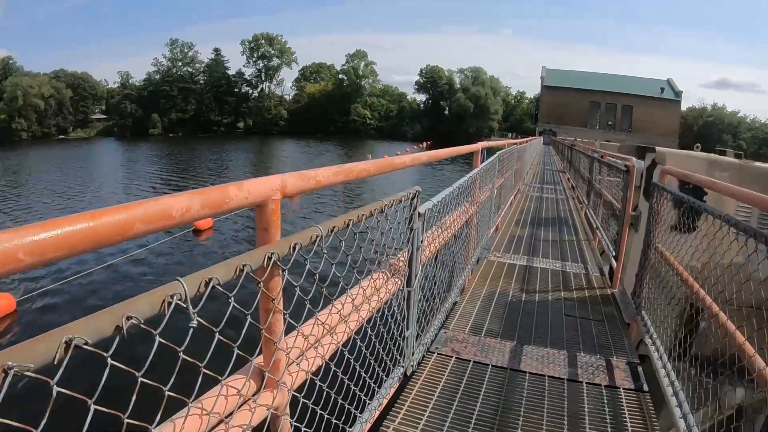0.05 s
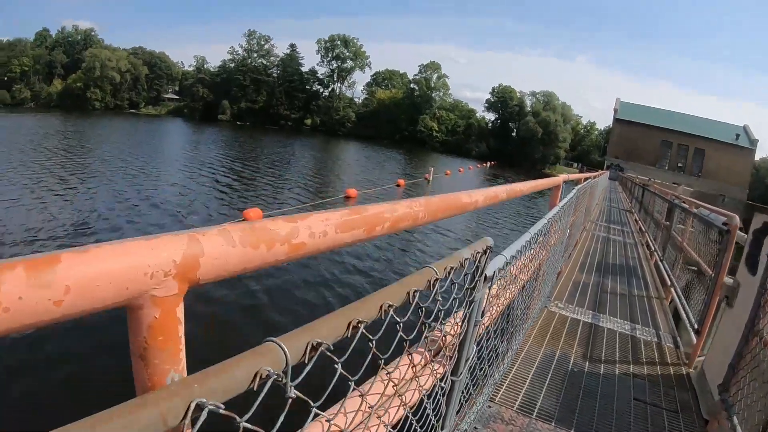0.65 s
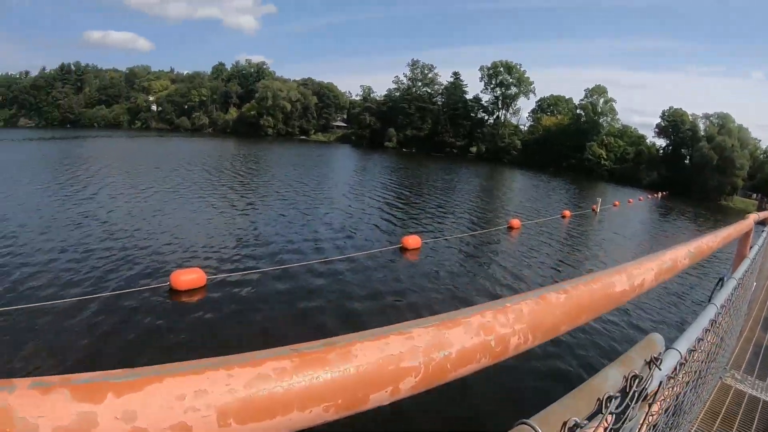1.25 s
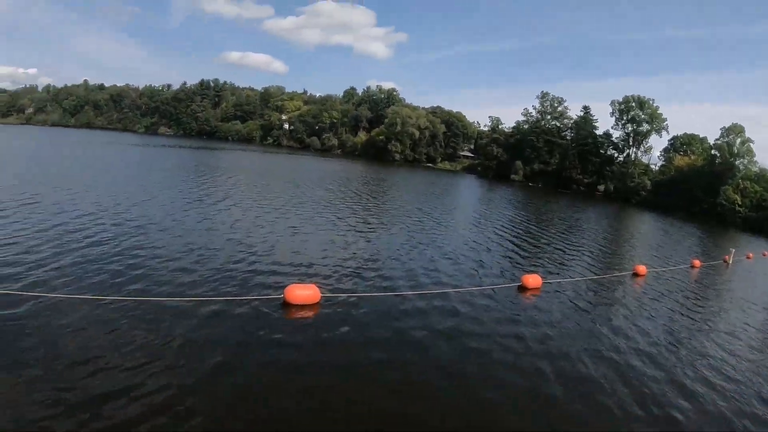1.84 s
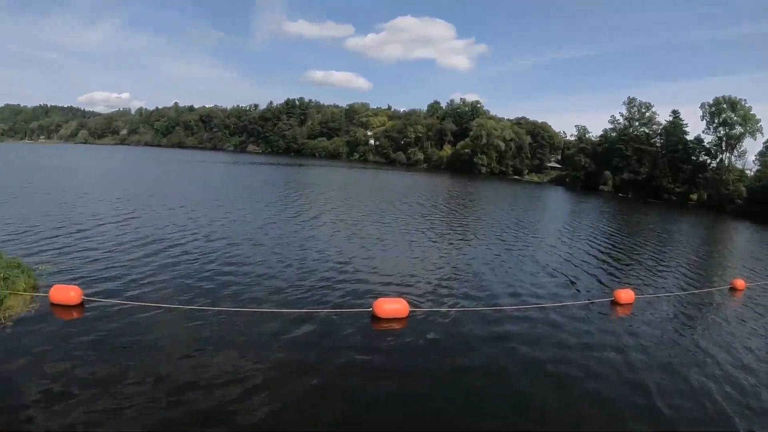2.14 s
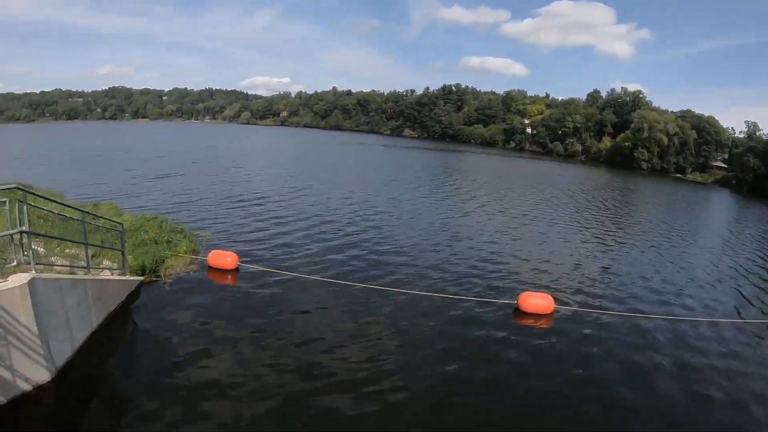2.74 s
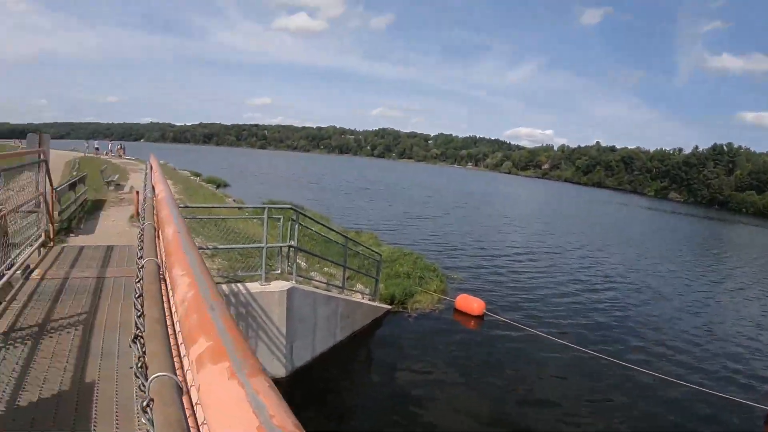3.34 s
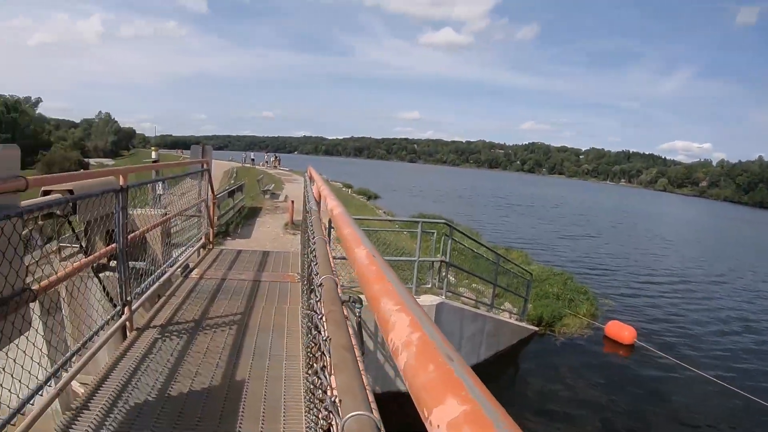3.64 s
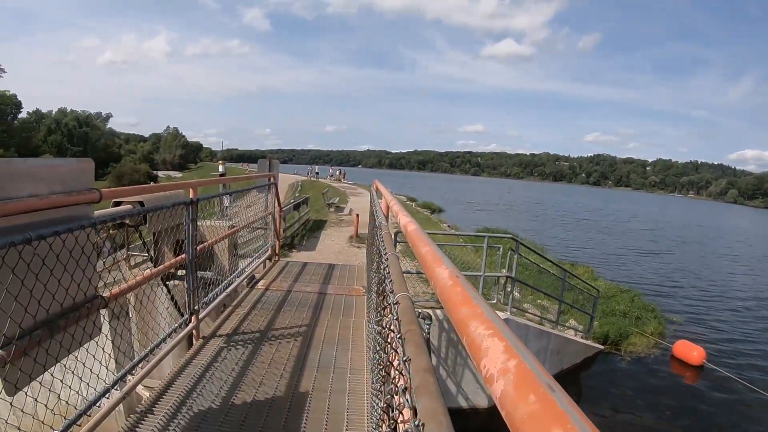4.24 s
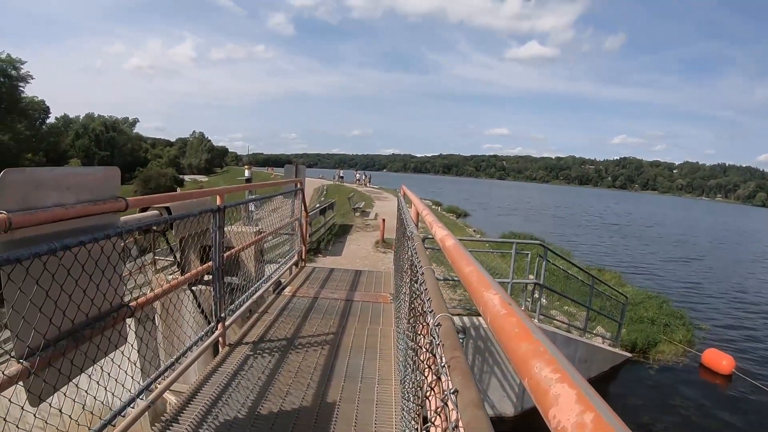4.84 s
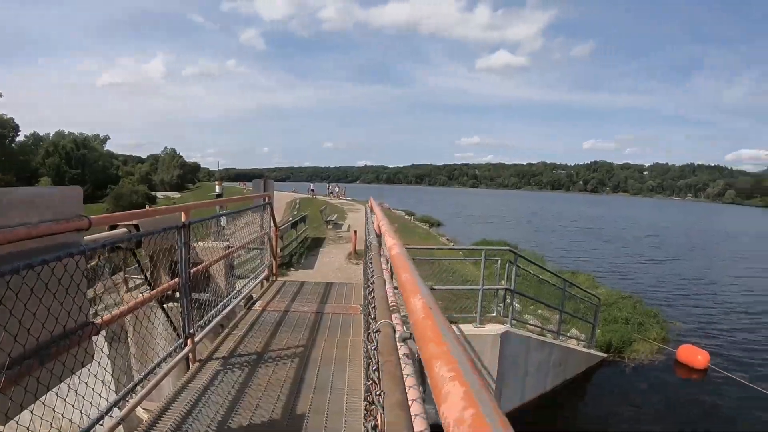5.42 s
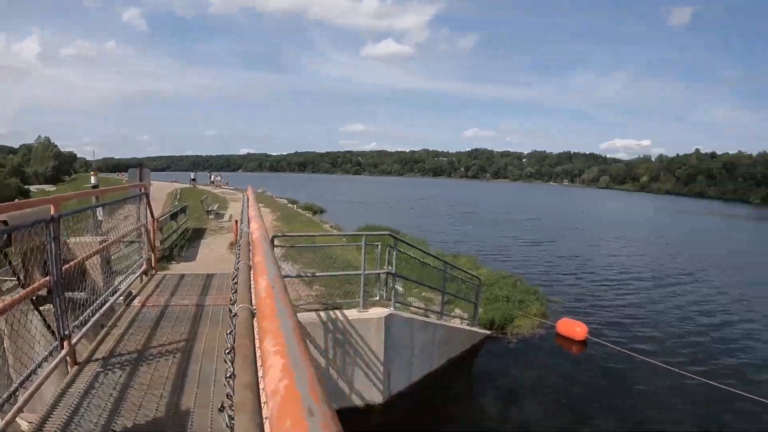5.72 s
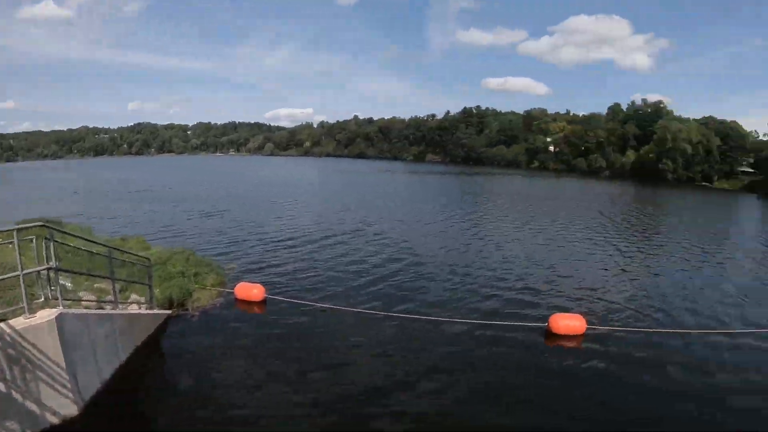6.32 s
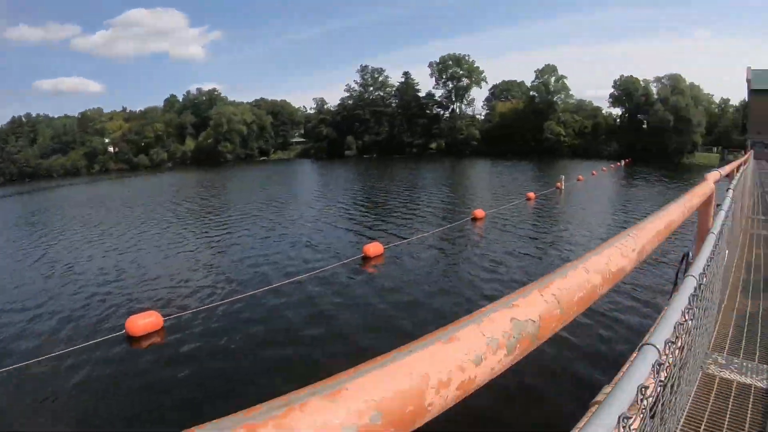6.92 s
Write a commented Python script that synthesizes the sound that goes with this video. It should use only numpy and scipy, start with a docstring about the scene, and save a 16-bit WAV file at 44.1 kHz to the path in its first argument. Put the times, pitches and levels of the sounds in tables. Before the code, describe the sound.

Water pours over a dam spillway in a deep, steady roar, with softer churning and a light hiss of spray.

```python
"""Water pours steadily over a dam spillway, heard from the steel walkway on its crest.
From the start, air clouds throb in the plunge pool as a deep roar, bubbles churn in the tailwater
and spray hisses above; from 0.3 s falling water slaps now and then. The hand-held microphone swings
round, which shades the hiss and shifts its hollow ring. A short plop comes near 3 s; from 3.6 s
the walkway ticks faintly. After 5.2 s the microphone swings part of the way back."""
import sys
import numpy as np
from scipy import signal
from scipy.fft import rfft, irfft
from scipy.io import wavfile

SR = 44100
rng = np.random.default_rng(int(sys.argv[2]) if len(sys.argv) > 2 else 0)


def output_pcm(signal):
    """Save a mono or channel-first signal as 16-bit PCM at the path in sys.argv[1].

    Samples are clipped to [-1, 1] before scaling.
    """
    pcm = np.clip(np.atleast_2d(signal).T, -1, 1) * 32767
    wavfile.write(sys.argv[1], SR, np.round(pcm).astype(np.int16))


N = 307377
TIME = np.arange(N) / SR
FREQS = np.maximum(np.fft.rfftfreq(N, 1 / SR), 1)

# Spectrum of churn and spray. Each row: frequency in Hz, gain in dB.
RUSH_SPECTRUM = [(500, 0), (700, -9.5), (900, -16.5), (1300, -19), (1850, -19.5), (3000, -22), (4100, -23),
                 (5500, -21), (6400, -19), (7200, -26), (8000, -32.5), (9500, -42.5), (11400, -55)]
# Microphone swing. Each row: time in seconds, heading in degrees
# (0 and 180 along the walkway, 90 over the lake, facing away from the falls).
MIC_HEADING = [(0, 16), (1.3, 56), (2.0, 89), (3.3, 126), (3.75, 156), (5.2, 182), (5.65, 151), (6.1, 132),
               (6.55, 96), (6.97, 66)]


def from_db(db):
    """Decibels to gain."""
    return 10 ** (np.asarray(db) / 20)


def unit_rms(x):
    """Scale to rms 1."""
    return x / np.sqrt(np.mean(x ** 2) + 1e-20)


def per_sample(rows):
    """Interpolate each column after the first (time in seconds) to every sample."""
    times_s, *columns = np.transpose(rows)
    return [np.interp(TIME, times_s, column) for column in columns]


def coloured(x, spectrum):
    """Filter by a curve of (Hz, dB) points."""
    hz, db = np.transpose(spectrum)
    gain_db = np.interp(np.log(FREQS), np.log(hz), db)
    return irfft(rfft(x) * from_db(gain_db), N)


def band(x, low_hz, high_hz, order=6):
    """Soft-edged band-pass, scaled to rms 1."""
    power = 1 / (1 + (low_hz / FREQS) ** (2 * order)) / (1 + (FREQS / high_hz) ** (2 * order))
    return unit_rms(irfft(rfft(x) * np.sqrt(power), N))


def drift(rate_hz):
    """Slow random wander, rms 1."""
    return unit_rms(irfft(rfft(rng.standard_normal(N)) / (1 + (FREQS / rate_hz) ** 2), N))


def ring(drive, hz, t60_s):
    """One mode: a unit click starts a decaying sine of height 1."""
    radius = from_db(-60 / (t60_s * SR))
    step_rad = 2 * np.pi * hz / SR
    feedback = [1, -2 * radius * np.cos(step_rad), radius * radius]
    return signal.lfilter([0, np.sin(step_rad)], feedback, drive + 1e-18)


def collapses(per_s, spread_db):
    """Random clicks of either sign, many small and a few large."""
    born = rng.random(N) < per_s / SR
    size = from_db(spread_db * np.minimum(rng.exponential(1, N), 4))
    return born * size * rng.choice([-1, 1], N)


def facing(target_deg, width_deg):
    """How nearly the microphone points along a heading, 0-1."""
    heading_deg, = per_sample(MIC_HEADING)
    return np.exp(-((heading_deg - target_deg) / width_deg) ** 2)


def mic_gain(level_db, half_turn_db, shadow_db, darkest_deg, width_deg):
    """Gain that tilts with heading and dips as the microphone turns its back on the falls."""
    heading_deg, = per_sample(MIC_HEADING)
    tilt_db = half_turn_db * heading_deg / 180
    return from_db(level_db + tilt_db - shadow_db * facing(darkest_deg, width_deg))


def plunge_pool(surge_db=0.5, swell_half_s=0.1):
    """Clouds of entrained air pulse as a whole: big ones rumble, smaller ones roar."""
    # Air cloud spectrum. Each row: frequency in Hz, gain in dB.
    spectrum = [(8, -25), (30, -8), (48, 2), (70, -0.5), (105, -1), (140, -1), (210, -2.5), (310, -2.5),
                (380, -6.5), (450, -14), (530, -21), (800, -28.5)]
    # Brief swells in the low roar. Each row: peak time in seconds, lift in dB.
    swells = [(0.3, 1), (1.17, 1.5), (3.5, 1), (5.24, 2)]
    rumble = band(coloured(rng.standard_normal(N), spectrum), 8, 213)
    rumble *= mic_gain(-22.2, half_turn_db=0.05, shadow_db=0.7, darkest_deg=110.5, width_deg=48)
    roar = band(coloured(rng.standard_normal(N), spectrum), 189, 695)
    roar *= mic_gain(-23.5, half_turn_db=-0.52, shadow_db=2.5, darkest_deg=102, width_deg=34)
    swell_db = sum(db * np.exp(-((TIME - peak_s) / swell_half_s) ** 2) for peak_s, db in swells)
    return rumble + roar * from_db(swell_db + surge_db * drift(rate_hz=2.1))


def bubbles(pitches_hz, per_s, t60_cycles, spread_db):
    """Bubbles ring briefly at random times, each at one of the pitches; one signal per pitch."""
    return [ring(collapses(per_s / len(pitches_hz), spread_db), hz, t60_cycles / hz)
            for hz in pitches_hz]


def tailwater(bubble_db=-1.5, gurgle_db=-14):
    """Single bubbles and sparse, larger gurgles ring over the blur of countless farther ones."""
    voices = bubbles(np.linspace(550, 1900, 16), per_s=1100, t60_cycles=20, spread_db=2.5)
    bubbling = unit_rms(sum(unit_rms(voice) for voice in voices))
    blur = band(rng.standard_normal(N), 500, 2000)
    gurgles = sum(bubbles(np.geomspace(780, 1600, 11), per_s=22, t60_cycles=30, spread_db=0.91))
    water = blur + from_db(bubble_db) * bubbling + from_db(gurgle_db) * unit_rms(gurgles)
    churn = band(coloured(water, RUSH_SPECTRUM), 683, 1446)
    return churn * mic_gain(-46, half_turn_db=0.45, shadow_db=0, darkest_deg=61, width_deg=25.5)


def droplets(low_hz, high_hz, per_s=9000, impact_db=-5, flutter_db=0.53):
    """One size class of spray: tiny impacts on a smooth hiss."""
    hiss = rng.standard_normal(N)
    impacts = from_db(impact_db) * unit_rms(collapses(per_s, spread_db=2.6))
    register = band(coloured(hiss + impacts, RUSH_SPECTRUM), low_hz, high_hz, order=8)
    return register * from_db(flutter_db * drift(rate_hz=17))


def spray():
    """Five registers of spray, each shaded differently as the microphone turns."""
    splash = droplets(1400, 2710, per_s=1500, impact_db=-1)
    splash *= mic_gain(-49.5, half_turn_db=1, shadow_db=4.5, darkest_deg=105, width_deg=63)
    hiss = droplets(2730, 5040)
    hiss *= mic_gain(-47.5, half_turn_db=-0.9, shadow_db=5.5, darkest_deg=109.5, width_deg=45)
    mist = droplets(4790, 7560)
    mist *= mic_gain(-47.5, half_turn_db=-1, shadow_db=5, darkest_deg=106.5, width_deg=51)
    fine_mist = droplets(8170, 11500)
    fine_mist *= mic_gain(-62, half_turn_db=2.5, shadow_db=4.5, darkest_deg=88, width_deg=42.5)
    # Top of the hiss. Each row: frequency in Hz, gain in dB.
    sheen_spectrum = [(11300, -7.5), (12500, 0), (13500, -4), (15500, -10)]
    sheen = band(coloured(rng.standard_normal(N), sheen_spectrum), 11600, 16500, order=16)
    sheen *= mic_gain(-75.8, half_turn_db=-4, shadow_db=7.5, darkest_deg=123, width_deg=40)
    return splash + hiss + mist + fine_mist + sheen


def with_echo(x, delay_s, strength, low_hz, high_hz):
    """Add a band-limited copy over a changing path: a moving comb filter."""
    reflected = irfft(rfft(x) / (1 + (low_hz / FREQS) ** 6) / (1 + (FREQS / high_hz) ** 6), N)
    return x + strength * np.interp(TIME - delay_s, TIME, reflected)


def railing_echo(rush, sound_cm_per_s=34300, near_cm=5.8, near_strength=0.36):
    """The railing answers sooner and louder when near, less when the microphone faces the lake."""
    # Microphone to railing. Each row: time in seconds, distance in cm.
    railing_gap = [(0, 14.3), (1.2, 14.5), (2.75, 16.6), (3.45, 13.4), (3.68, 6.7), (4.1, 11.6),
                   (4.6, 11.5), (5.35, 16.5), (5.75, 13.3), (6.6, 14), (6.97, 13.5)]
    gap_cm, = per_sample(railing_gap)
    pickup = 1 - 0.79 * facing(target_deg=80, width_deg=20)
    strength = near_strength * near_cm / gap_cm * pickup
    return with_echo(rush, 2 * gap_cm / sound_cm_per_s, strength, low_hz=650, high_hz=2200)


def steelwork_ring(rush):
    """The rush rings hollow among the steelwork: two bands glide as the microphone moves."""
    # Lower and upper resonance. Each row: time in seconds, pitch in Hz, lift in dB (negative cuts).
    low_glide = [(0, 904, 1), (2.5, 903, 0.5), (3.0, 900, 1.5), (3.3, 790, 4.5), (3.58, 800, 4),
                 (3.76, 930, -7), (4.0, 955, 1), (4.9, 1030, 3.5), (5.3, 1010, 2.5), (5.7, 1070, 3.5),
                 (5.95, 1000, 2.5), (6.6, 720, 1.5)]
    high_glide = [(0, 2000, 1.5), (0.7, 2100, 4), (1.3, 1700, -2), (1.85, 1580, 0.5), (2.35, 1470, 2),
                  (2.78, 1450, 5.5), (3.05, 1380, 1.5), (3.45, 1550, -3), (3.78, 1790, 3), (4.1, 1530, 3),
                  (4.5, 1580, 3), (4.95, 1450, 1), (5.4, 1500, 1), (6.25, 1400, -3), (6.45, 1430, 4.5),
                  (6.65, 1280, 4.5), (6.97, 1290, 3.5)]
    for glide, width_hz in ((low_glide, 160), (high_glide, 190)):
        hz, lift_db = per_sample(glide)
        carrier = np.exp(2j * np.pi * np.cumsum(hz) / SR)
        pole = np.exp(-np.pi * width_hz / SR)
        # Shift the pitch to 0 Hz, low-pass, shift back.
        baseband = signal.lfilter([1 - pole], [1, -pole], rush / carrier)
        resonance = 2 * np.real(baseband * carrier)
        rush = rush + (from_db(lift_db) - 1) * resonance
    return rush


def slaps(rise_s=0.007, width_octaves=0.7):
    """A sheet of water slaps the pool and stands out of the churn for an instant."""
    # Each row: peak time in seconds, level in dB, pitch in Hz, decay in seconds.
    sheet_impacts = [(0.262, -43, 800, 0.022), (1.168, -51, 1150, 0.025), (1.732, -46.5, 850, 0.012),
                     (2.16, -46, 1200, 0.036), (3.097, -47, 980, 0.02), (3.315, -49, 770, 0.02),
                     (4.369, -45, 780, 0.02), (5.701, -49, 1200, 0.016)]
    edge_ratio = 2 ** (width_octaves / 2)
    out = 0
    for peak_s, db, hz, decay_s in sheet_impacts:
        age_s = TIME - peak_s
        falloff = np.where(age_s < 0, (age_s / rise_s) ** 2, age_s / decay_s)
        envelope = np.exp(-np.minimum(falloff, 20))
        noise = band(rng.standard_normal(N), hz / edge_ratio, hz * edge_ratio, order=3)
        out += from_db(db) * envelope * noise
    return out


def plop_and_ticks(drive_cutoff_hz=3900, scuff_s=0.0037, scuff_db=-17.5):
    """A short plop, then faint walkway ticks: a click and scuff ring damped modes around a pitch."""
    # The plop comes first. Each row: start in seconds, level in dB, pitch in Hz, spread in octaves.
    events = [(2.976, -35.5, 950, 0.3), (3.599, -35.5, 1150, 4.2), (5.14, -38, 1400, 1),
              (6.634, -36, 1300, 0.4)]
    # Damped modes. Each row: frequency in Hz, gain in dB, 60 dB decay time in seconds.
    modes = [(130, 29.5, 0.043), (775, 3, 0.019), (960, 4, 0.018), (1300, 0, 0.014), (1710, -3.5, 0.025),
             (2150, -0.5, 0.014), (3090, -4.5, .012), (4600, -6, .01)]
    softening = signal.butter(2, drive_cutoff_hz, fs=SR, output="sos")
    out = 0
    for start_s, db, pitch_hz, spread_octaves in events:
        age_s = TIME - start_s
        scuff_envelope = (age_s >= 0) * np.exp(-np.minimum(np.abs(age_s) / scuff_s, 20))
        onset = from_db(scuff_db) * rng.standard_normal(N) * scuff_envelope
        onset[round(start_s * SR)] += 1  # the click
        drive = signal.sosfilt(softening, onset)
        for k, (hz, mode_db, t60_s) in enumerate(modes):
            share = np.exp(-(np.log2(hz / pitch_hz) / spread_octaves) ** 2)
            out += ring(drive, hz, t60_s) * from_db(db + mode_db) * share * (-1) ** k
    return out


def hand_echo(rush):
    """The hand holding the microphone gets in the way once on each turn and adds a short detour."""
    # Each row: centre in seconds, half length in seconds, delay in ms, its sweep in ms/s, strength 0-1.
    passes = [(3.27, 0.36, 0.14, 0.04, 0.4), (6.66, 0.28, 0.11, 0.095, 0.38)]
    for centre_s, half_s, detour_ms, sweep_ms_per_s, peak in passes:
        offset_s = TIME - centre_s
        delay_s = (detour_ms + sweep_ms_per_s * offset_s) / 1000
        strength = peak * np.exp(-(offset_s / half_s) ** 2)
        rush = with_echo(rush, delay_s, strength, low_hz=2300, high_hz=8000)
    return rush


def scene(gush_db=0.29):
    """Roar below, churn and spray gushing together above, slaps, a plop and ticks; mono."""
    rush = (tailwater() + spray()) * from_db(gush_db * drift(rate_hz=16))
    rush = steelwork_ring(hand_echo(railing_echo(rush)))
    return (plunge_pool() + rush + slaps() + plop_and_ticks())[None]


def record(dry, fade_s=0.003, cutoff_hz=15700):
    """Fade both ends and cut the top steeply."""
    fade = np.clip(np.minimum(TIME, TIME[-1] - TIME) / fade_s, 0, 1)
    lowpass = signal.ellip(10, 0.1, 80, cutoff_hz, fs=SR, output="sos")
    return signal.sosfilt(lowpass, dry * fade)


dry = scene()
out = record(dry)
output_pcm(out)
```